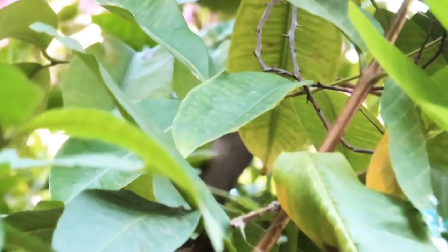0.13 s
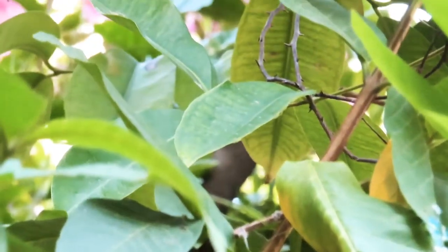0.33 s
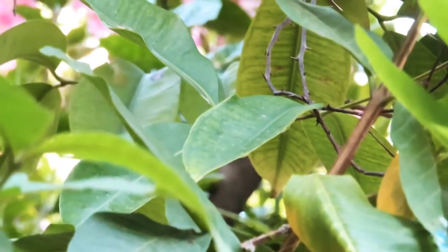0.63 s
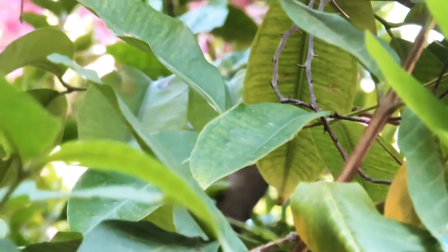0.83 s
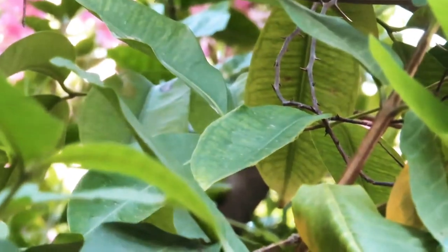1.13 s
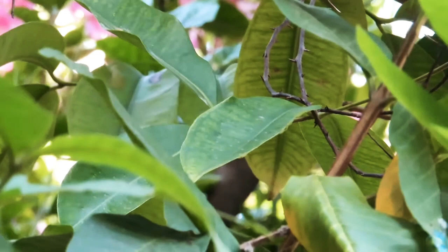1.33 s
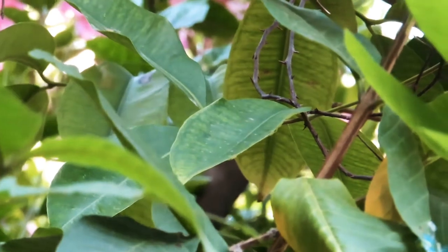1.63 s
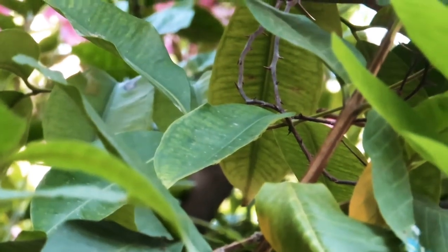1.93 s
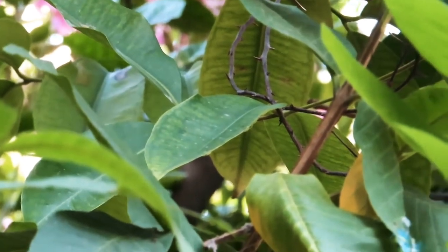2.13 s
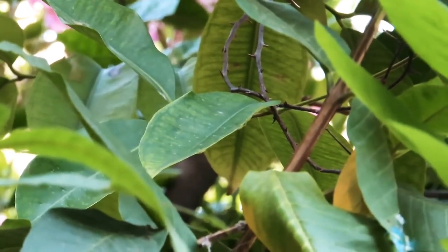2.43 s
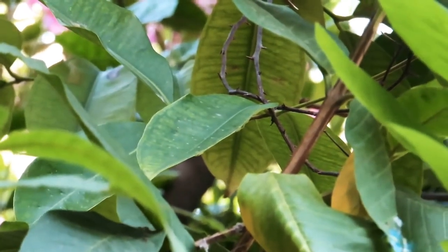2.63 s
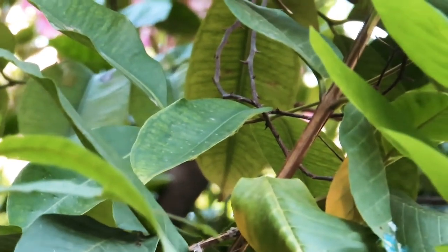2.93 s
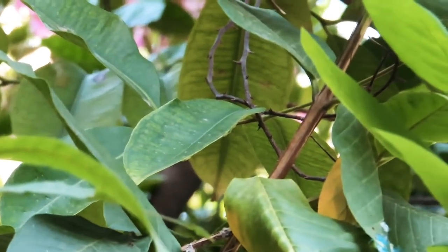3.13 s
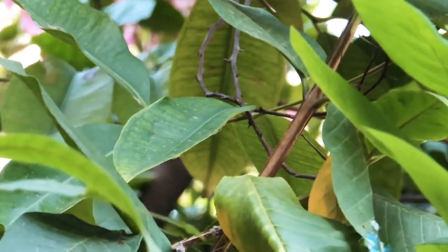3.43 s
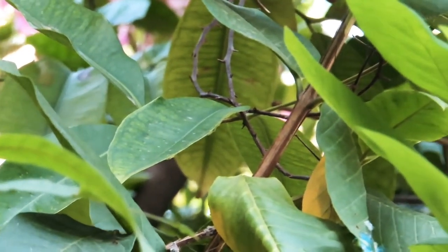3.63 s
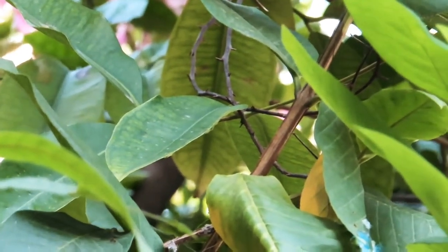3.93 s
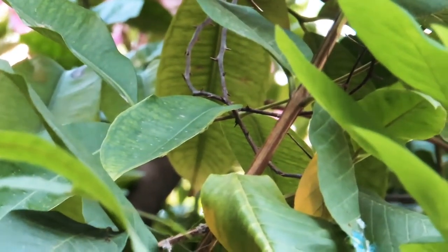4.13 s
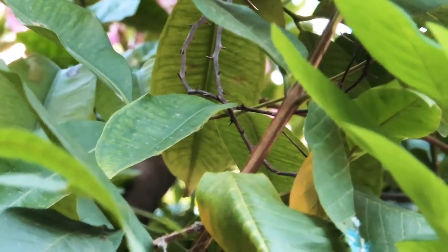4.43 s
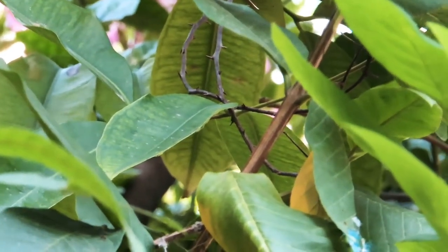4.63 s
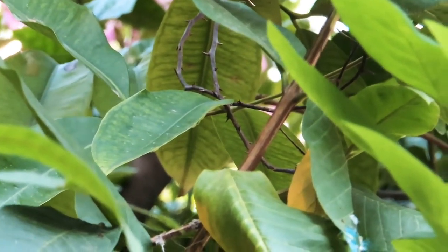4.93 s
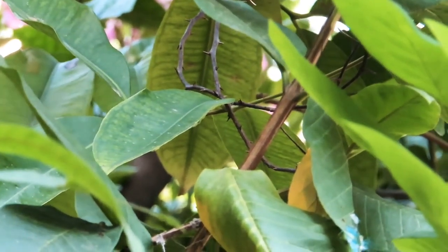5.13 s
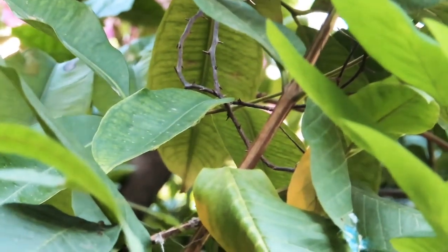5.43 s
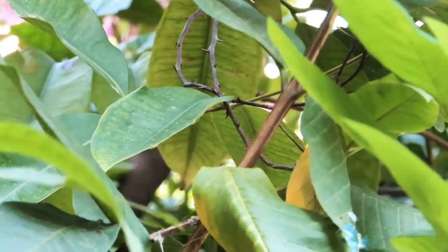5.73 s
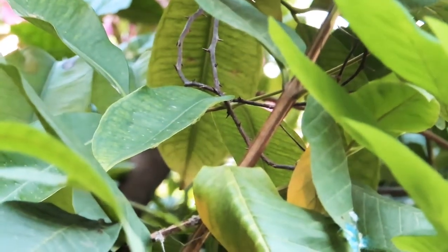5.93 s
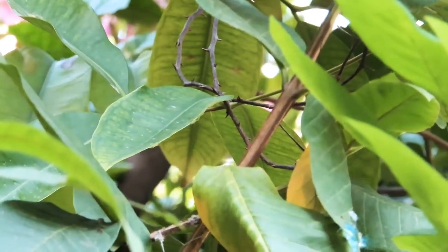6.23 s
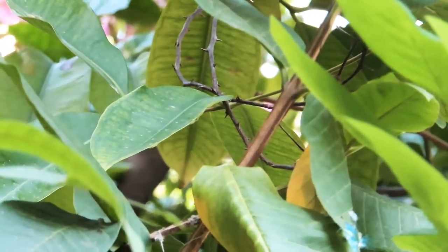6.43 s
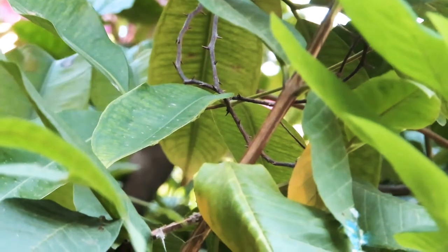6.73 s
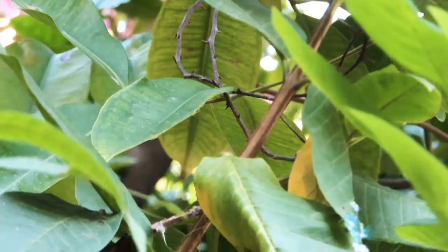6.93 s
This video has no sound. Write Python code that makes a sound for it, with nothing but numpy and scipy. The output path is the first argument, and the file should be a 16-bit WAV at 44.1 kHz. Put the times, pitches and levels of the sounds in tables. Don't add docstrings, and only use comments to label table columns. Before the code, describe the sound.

Hoarse buzzing bird phrases, then a fast run of bright upward whistles, then more buzzes, in an echoing leafy garden with low far-off rumble.

```python
import sys
import numpy as np
from scipy import signal
from scipy.io import wavfile
from scipy.ndimage import uniform_filter1d

SR = 44100
rng = np.random.default_rng(int(sys.argv[2]) if len(sys.argv) > 2 else 0)


def linear_from_db(decibels):
    return 10 ** (np.asarray(decibels, float) / 20)


def bounce(signal):
    frames = np.transpose(np.atleast_2d(signal))
    limited = np.clip(frames, -1, 1)
    pcm = np.round(limited * 32767).astype(np.int16)
    wavfile.write(sys.argv[1], SR, pcm)


N = 312228


def rms_one(x):
    return x / np.sqrt(np.mean(x ** 2) + 1e-20)


def at_hz(points, hz):
    curve_hz, value = np.transpose(points)
    return np.interp(np.log(hz), np.log(curve_hz), value)


def drift(rate, size=N):
    r = np.exp(-2 * np.pi * rate / SR)
    settle = 20000
    noise = rng.standard_normal(size + settle)
    return rms_one(signal.lfilter([1], [1, -2 * r, r * r], noise)[settle:])


def band_filter(x, order, low_hz, high_hz):
    return signal.sosfilt(signal.butter(order, [low_hz, high_hz], "band", fs=SR, output="sos"), x)


def band(low_hz, high_hz):
    return rms_one(band_filter(rng.standard_normal(N), 4, low_hz, high_hz))


def resonate(x, hz, width):
    r = np.exp(-np.pi * width / SR)
    turn = 2 * r * np.cos(2 * np.pi * hz / SR)
    return signal.lfilter([(1 - r * r) / 2, 0, (r * r - 1) / 2], [1, -turn, r * r], x)


def ramps(t, length, rise, fall):
    return np.clip(np.minimum(t / rise, (length - t) / fall), 0, 1)


def add(out, s, sound):
    i = max(round(s * SR), 0)
    out[i:i + len(sound)] += sound[:N - i]


def partials(hz, levels_db):
    phase = 2 * np.pi * np.cumsum(hz) / SR
    return sum(linear_from_db(db) * (k * hz < .45 * SR) * np.sin(k * phase) for k, db in enumerate(levels_db, 1))


def glide(call, attack_s, release_s, edge_db):
    start, length, db, first_hz, last_hz = call
    t = np.arange(N) / SR - start
    rise = ramps(t, length, attack_s, release_s)
    pitch = first_hz + (last_hz - first_hz) * np.clip(t / length, 0, 1)
    return pitch, db + edge_db * (rise - 1), (t >= 0) & (t <= length)


def wavering(calls, wobble, rate, under_db, attack_s, release_s):
    out = np.zeros(N)
    for call in calls:
        hz, db, on = glide(call, attack_s, release_s, 12)
        out += on * linear_from_db(db) * partials(hz / 2 * (1 + wobble * drift(rate)), [under_db, 3])
    return out


def rasp(voice, throat_db, hiss_db):
    effort = np.sqrt(uniform_filter1d(voice ** 2, size=200) + 1e-12)
    throat = linear_from_db(throat_db) * band(4030, 6800)
    beak = linear_from_db(hiss_db + 4 * drift(25)) * band(12050, 15600)
    return voice + effort * (throat + beak)


# f/Hz, level/dB
SWEEP_THROAT = [(2800, 19), (3600, -9), (4400, -3), (5000, -1), (6200, -2.5), (7100, -6.5), (8000, -4.5),
                (10000, -62)]


def sweeps(notes, swell_db, wobble_share, flutter_db, rasp_db):
    out, wobble = np.zeros(N), wobble_share * drift(154)
    for start, peak_db, length, low_hz, high_hz, upper_db in notes:
        u = np.linspace(0, 1, round(length * SR))
        at = max(round(start * SR), 0)
        unsteady = 1 + np.resize(wobble[at:at + len(u)], len(u))
        pitch = low_hz * (high_hz / low_hz) ** (u ** .9) * unsteady
        breath = ramps(u, 1, .14, .12)
        lower = linear_from_db(at_hz(SWEEP_THROAT, pitch)) * partials(pitch, [0, -38, -38])
        upper_gain = linear_from_db(at_hz(SWEEP_THROAT, 1.5 * pitch) + upper_db - 28 * u)
        upper = upper_gain * partials(1.5 * pitch, [0, -30])
        add(out, start, linear_from_db(peak_db + swell_db * (u - 1)) * breath * (lower + upper))
    return rasp(out * linear_from_db(2 * flutter_db * np.tanh(drift(350) / 2)), rasp_db, -35)


# f/Hz, level/dB per Hz
TOWN_COLOUR = [(15, -33), (25, -11), (49, -2.5), (72, -6.5), (200, -12.5), (335, -17), (394, -10),
               (451, -20.5), (531, -17), (840, -21), (2050, -29), (4250, -40), (5570, -48), (11900, -58.5),
               (16000, -84)]
# f/Hz, likeness
TOWN_LIKENESS = [(35, 1), (70, .9999), (150, 1), (300, 0.98), (600, 0.99), (1200, 0.99), (2500, 0.93),
                 (5000, 0.5), (9000, 0.26), (14000, -0.47)]


def town():
    out, together, edges = 0, drift(1.5), np.geomspace(25, 17000, 23)
    white = rng.standard_normal((2, 2, N))
    for k, (low, high) in enumerate(zip(edges, edges[1:])):
        mid, side = band_filter(white[k % 2], 2, low, high)
        hz = np.sqrt(low * high)
        alike = np.clip(at_hz(TOWN_LIKENESS, hz), -1, 1)
        gain = linear_from_db(at_hz(TOWN_COLOUR, hz) + 0.23 * together + 1.45 * drift(13.2))
        out = out + gain * (np.sqrt(1 + alike) * mid + np.sqrt(1 - alike) * side * [[1], [-1]])
    t = np.arange(N) / SR
    passing_s, rise_s, fall_s = 1.48, .1, .33
    from_peak = t - passing_s
    passing = np.clip(np.minimum(1 + from_peak / rise_s, 1 - from_peak / fall_s), 0, 1)
    level_db, fade_db_per_s = -32.5, 0.24
    return linear_from_db(level_db - fade_db_per_s * t + 3 * passing) * rms_one(out)


# length/s, start f/Hz, end f/Hz, upper line level/dB
PEEP_SHAPE = (0.06, 4898, 6480, -30)
# t/s, level/dB
PEEP_TIMES = [
    (.0, -59),
    (.115, -52.5),
    (.21, -52),
    (.29, -50),
    (.401, -51),
]


def phrase_notes():
    run_up = (3299, 5749, 0.5)
    hook, close, crest = (0.01, 3396, 4416, -32), (.038, 5950, 6252, -30), (.03, 7052, 7150, -40)
    notes = [(*note, *PEEP_SHAPE) for note in PEEP_TIMES]
    for s, db, length, lead_s, lead_db in BUZZ_TIMES:
        end = s + length
        notes += [(s - lead_s, lead_db, .9 * lead_s, *run_up),
                  (s - .019, db - 7.5, *hook),
                  (end - .018, db - 4, *close),
                  (end - 0.023, db - 10.5, *crest)]
    return notes


# t/s, length/s, level/dB
ENGINE_SURGES = [(.18, .22, -35), (0.466, 0.14, -34), (.68, 0.5, -30), (1.3, .35, -42),
                 (1.846, 0.66, -31.5), (2.682, .36, -29), (3.05, 0.51, -30.5), (3.497, 0.48, -30),
                 (4.1, .17, -30), (4.9, 0.25, -38), (5.255, 0.5, -31.5), (5.898, 1.3, -28.5)]


def engine():
    t, load = np.arange(N) / SR, np.zeros(N)
    for start, length, db in ENGINE_SURGES:
        load += linear_from_db(db) * ramps(t - start, length, .09, .09)
    firing_hz = 44.5 * (1 + 0.0418 * drift(3.17))
    return linear_from_db(-3.5) * load * np.sin(2 * np.pi * np.cumsum(firing_hz) / SR)


# t/s, length/s, level/dB, start f/Hz, end f/Hz
INSECT_TRILLS = [
    (.26, .46, -64.5, 9360, 8750),
    (3.0, 1.15, -63, 10700, 9900),
]


def trills():
    short = wavering(INSECT_TRILLS[:1], 0.051, 346, -44, 0.018, 0.14)
    long = wavering(INSECT_TRILLS[1:], 0.062, 404, -60, 0.55, 0.37)
    return short + long


# t/s, level/dB, top f/Hz, time to fall 60 dB/s
BUMP_TIMES = [
    (.63, -34, 970, 1),
    (.3, -49, 5900, 0.91),
    (.85, -35.5, 920, 0.34),
]


def bumps():
    out, t = np.zeros(N), np.arange(SR // 2) / SR
    for start, peak_db, hz, t60 in BUMP_TIMES:
        puff = rms_one(band_filter(rng.standard_normal(len(t)), 2, hz / 3, hz))
        add(out, start, linear_from_db(peak_db - 60 * t / t60) * np.minimum(t / 0.0061, 1) * puff)
    return out


# t/s, level/dB, f/Hz
CHIP_TIMES = [(.388, -38, 2146), (.715, -41.5, 2135), (1.162, -40.5, 2080), (1.4, -38.5, 2130),
              (1.92, -40.5, 2110), (2.135, -39.5, 2154), (2.36, -39.5, 2134), (5.258, -41.5, 2070),
              (5.557, -42.5, 2080), (6.383, -42.5, 2060)]


def chips():
    out, t = np.zeros(N), np.arange(round(0.029 * SR)) / SR
    shape = ramps(t, t[-1], .004, .008) * linear_from_db(-300 * t)
    for start, peak_db, hz in CHIP_TIMES:
        noise = rng.standard_normal(len(t))
        breath = rms_one(resonate(resonate(noise, 3000, 2500), 3000, 2500))
        tone = partials(hz * (1 + 0.89 * t), [0, 1.5, -8])
        add(out, start, linear_from_db(peak_db) * shape * (tone + 0.75 * breath))
    return out


# t/s, level/dB, length/s, run-up begins before/s, run-up level/dB
BUZZ_TIMES = [(.783, -30, 0.098, .045, -37), (1.02, -25.5, 0.09, 0.05, -32),
              (1.259, -24.5, 0.071, 0.058, -30.5), (5.315, -24.5, 0.075, 0.037, -33),
              (5.62, -25.5, 0.06, 0.046, -34.5), (6.448, -24, 0.072, .046, -31.5),
              (6.702, -24, 0.065, 0.059, -33.5), (6.93, -24.5, .07, .066, -34)]
# f/Hz, level/dB
BUZZ_COLOUR = [(3500, -14), (4500, 4), (5000, -0.5), (6200, -4.5), (7200, -8.5), (8000, -16)]


def buzzes():
    out = np.zeros(N)
    low_hz, high_hz, vibrato_hz, throws_per_s = 4800, 6720, 861, 76
    for start, peak_db, length, *_ in BUZZ_TIMES:
        u = np.linspace(0, 1, round(length * SR))
        turn = 2 * np.pi * throws_per_s * length * u
        throw = (0.2 + 0.8 * u) * np.cos(turn + 0.54 * np.sin(turn))
        pitch = low_hz + (high_hz - low_hz) * u - vibrato_hz * throw
        accent = linear_from_db(2.5 * np.exp(-u / .12))
        pushes = linear_from_db(0.91 * np.sin(turn - .8))
        breath = ramps(u, 1, .04, .15) * accent * pushes
        octave_db = -33 + 14 * np.minimum(np.log2(pitch / 6200), 0) / 0.71
        tone = partials(pitch, [0, octave_db, -38])
        add(out, start, linear_from_db(peak_db + at_hz(BUZZ_COLOUR, pitch)) * breath * tone)
    return rasp(out * linear_from_db(5.4 * np.tanh(drift(170) / 2)), -22, -40)


# t/s, level/dB, length/s, start f/Hz, upper line level/dB
UPBEAT_NOTES = [(1.417, -28.5, 0.059, 3640, -2.5), (1.64, -27.5, 0.081, 3800, -2),
                (1.88, -27.5, 0.066, 3900, -6), (2.124, -25.5, 0.057, 4030, -2),
                (2.368, -28.5, .054, 4240, 2), (2.575, -24, 0.09, 3730, -17),
                (2.859, -27.5, .054, 4610, -12), (3.065, -30.5, 0.084, 3570, -1),
                (3.288, -25.5, 0.094, 3370, -9), (3.532, -30, .085, 3360, -1),
                (3.764, -30.5, .085, 3400, -2), (4.007, -31, 0.091, 3310, -2),
                (4.306, -30.5, 0.078, 3350, -4), (4.575, -30, 0.077, 3290, -4)]
# t/s, level/dB, length/s, start f/Hz, end f/Hz
ANSWER_NOTES = [(1.457, -30, .025, 6500, 6540), (1.818, -29, 0.023, 3400, 4730),
                (1.85, -29.5, 0.053, 4600, 5130), (1.92, -32, .074, 6900, 6560),
                (2.073, -27, .042, 4240, 5220), (2.31, -25, .082, 3700, 5960),
                (2.755, -29.5, 0.0256, 4800, 5840), (2.83, -25.5, .075, 3450, 5200),
                (2.99, -28, .086, 3710, 5540), (4.05, -30, .043, 4650, 6340),
                (3.434, -23.5, .063, 3420, 5620)]
# length/s, start f/Hz, end f/Hz, upper line level/dB
SQUEAK_SHAPE = (.022, 6000, 8300, -30)
# t/s, level/dB
SQUEAK_TIMES = [
    (2.135, -35),
    (2.256, -38),
    (2.366, -45),
    (2.643, -36),
    (2.768, -36),
    (2.91, -39),
]


def duet_notes():
    top_hz, answer_upper_db = 6400, -24
    upbeats = [(s, db, length, hz, top_hz, upper_db) for s, db, length, hz, upper_db in UPBEAT_NOTES]
    answers = [(*note, answer_upper_db) for note in ANSWER_NOTES]
    squeaks = [(*note, *SQUEAK_SHAPE) for note in SQUEAK_TIMES]
    return upbeats + answers + squeaks


# t/s, length/s, level/dB, start f/Hz, end f/Hz
CAW_TIMES = [
    (1.418, 0.14, -43, 404, 394),
    (1.559, 0.23, -43, 366.7, 358),
    (5.249, 0.39, -56, 365, 394),
    (5.991, .36, -56, 404.4, 341.5),
    (6.584, 0.31, -56, 413.4, 386),
]
# f/Hz, width/Hz, level/dB
CAW_COLOUR = [(1614, 200, 0.5), (1913, 480, 0), (810, 290, -3.5)]


def caws():
    source = np.zeros(N)
    for call in CAW_TIMES:
        hz, db, on = glide(call, 0.032, 0.056, 11)
        cycles = np.cumsum(hz * (1 + 0.03494 * drift(60))) / SR
        pulses = rms_one(np.diff(np.floor(cycles), prepend=0))
        source += on * linear_from_db(db) * (pulses + 0.83 * rng.standard_normal(N))
    throat = sum(linear_from_db(db) * resonate(resonate(source, hz, width), hz, width) for hz, width, db in CAW_COLOUR)
    return linear_from_db(10.5) * throat


# t/s from start, f/Hz, level/dB
WHISTLE_SHAPE = [(-.045, 2350, -44), (-.001, 3141, -34), (.012, 3482, -21), (0.02, 4140, -13),
                 (0.033, 4453, -5), (.05, 4757, -3.5), (.075, 5200, -4.5), (.1, 5420, -11.5),
                 (.112, 5140, -80)]
# t/s, level/dB, pitch factor, stretch
WHISTLE_TIMES = [(1.476, -19, 1.012, 1.03), (1.706, -19.5, 1, 0.95), (1.943, -18.5, 1.014, 0.98),
                 (2.178, -18, 0.99, 0.99), (2.416, -17, 1.005, 1.04), (2.653, -18.5, 0.97, 1.04),
                 (2.894, -19.5, 0.99, 0.93), (3.13, -16.5, 1.006, 0.98), (3.367, -17, 1, 0.88),
                 (3.599, -18, 1.001, 0.93), (3.842, -19.5, 1.001, 1.02), (4.086, -20, 0.99, 0.99),
                 (4.373, -19.5, 1, 0.96), (4.645, -18.5, 0.99, 0.94)]


def whistler():
    out, (s, hz, db) = np.zeros(N), np.transpose(WHISTLE_SHAPE)
    for start, peak_db, factor, stretch in WHISTLE_TIMES:
        t = np.arange(s[0] * stretch * SR, s[-1] * stretch * SR) / SR / stretch
        pitch = factor * uniform_filter1d(np.interp(t, s, hz), size=150)
        loudness = linear_from_db(peak_db + np.interp(t, s, db))
        add(out, start + s[0] * stretch, loudness * partials(pitch, [0, -42, -36]))
    return rasp(out * linear_from_db(3 * drift(127)), -26, -49)


# t/s, length/s, level/dB, start f/Hz, end f/Hz
COO_TIMES = [
    (2.6, .38, -52.5, 767.4, 760),
    (3.97, 0.39, -56.5, 778, 735),
    (5.15, .53, -52, 689, 761.6),
    (6.72, 0.47, -53, 769, 767),
]


def coos():
    return linear_from_db(-2) * wavering(COO_TIMES, .05, 40.6, -2, 0.057, 0.089)


# t/s, level/dB, f/Hz, time to fall 60 dB/s
THUD_TIME = [
    (3.478, -20, 104, 0.28),
]


def thud():
    out, t = np.zeros(N), np.arange(SR // 2) / SR
    start, peak_db, hz, t60 = THUD_TIME[0]
    add(out, start, linear_from_db(peak_db - 60 * t / t60) * np.minimum(t / 0.019, 1) * np.sin(2 * np.pi * hz * t))
    return out


def garden(x, near_db, far_db, wide_db):
    t = np.arange(SR) / SR
    decay = linear_from_db(near_db - 60 * t / 0.18) + linear_from_db(far_db - 60 * t / 1.15)
    mid, side = rng.standard_normal((2, SR)) * decay * np.minimum(t / 0.0047, 1)
    side = 0.1 * side + 1.06 * np.diff(side, prepend=0)
    mid[0] = 1
    echo = mid + linear_from_db(wide_db) * side * [[1], [-1]]
    return signal.fftconvolve(x[None], echo, axes=1)[:, :N]


def scene():
    hoarse = garden(sweeps(phrase_notes(), 8, 0.0248, 5.5, -15) + buzzes(), -26.5, -49.5, -3.5)
    insects = garden(trills(), -33, -41.5, 1.8)
    duet = garden(sweeps(duet_notes(), 2.1, 0.0149, 4.86, -14) + chips(), -28.5, -50, -2.5)
    far = garden(caws() + coos(), -24.5, -27.5, -32)
    clear = garden(whistler(), -26.5, -48.5, -4)
    return town() + hoarse + engine() + insects + bumps() + duet + far + clear + thud()


def starve_above_calls(x, from_db, full_db):
    call = band_filter(x.mean(axis=0), 4, 5900, 7500)
    level_db = 10 * np.log10(uniform_filter1d(call ** 2, size=1900) + 1e-12)
    share = np.clip((level_db - from_db) / max(full_db - from_db, 1), 0, 1)
    upper_band = signal.sosfiltfilt(signal.butter(5, [7700, 10800], "band", fs=SR, output="sos"), x)
    return x - share * upper_band


def roll_off(x):
    return signal.sosfilt(signal.butter(12, 16000, fs=SR, output="sos"), x)


def record(dry):
    heard = dry + 0.95 * resonate(dry, 16200, 2400)
    heard = signal.sosfilt(signal.butter(6, 36, "high", fs=SR, output="sos"), heard)
    heard = signal.sosfilt(signal.cheby2(14, 60, 16500, fs=SR, output="sos"), heard)
    heard = starve_above_calls(heard, -36, -33)
    return roll_off(heard)


dry = scene()
out = record(dry)
bounce(out)
```